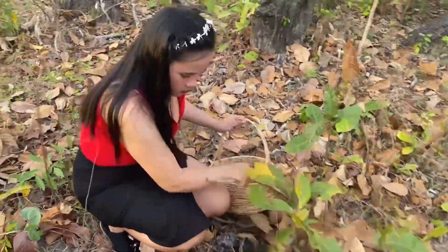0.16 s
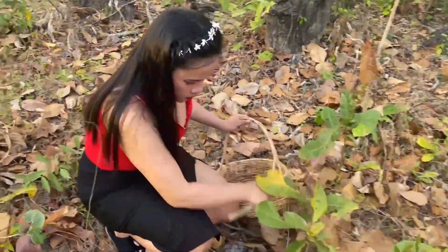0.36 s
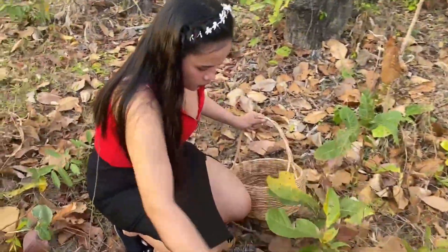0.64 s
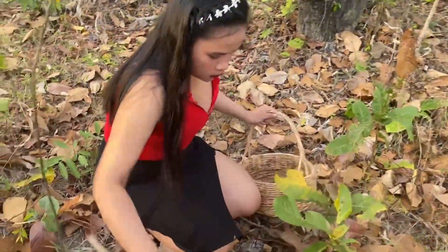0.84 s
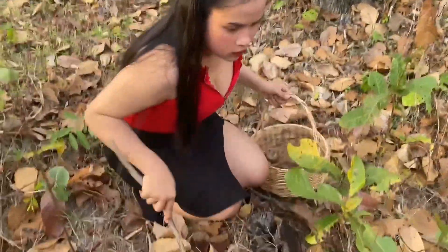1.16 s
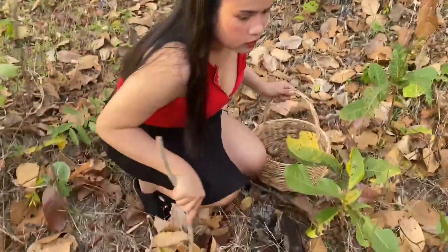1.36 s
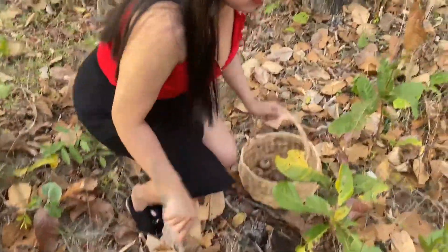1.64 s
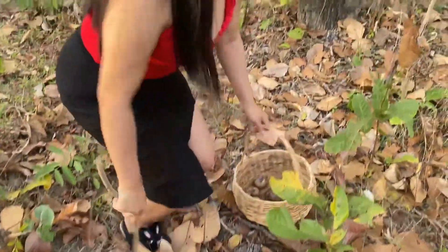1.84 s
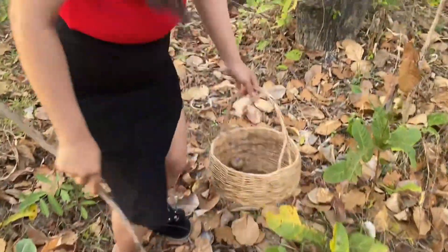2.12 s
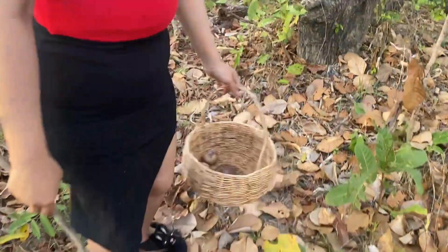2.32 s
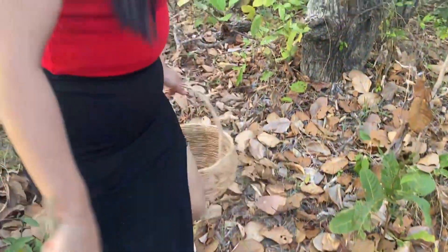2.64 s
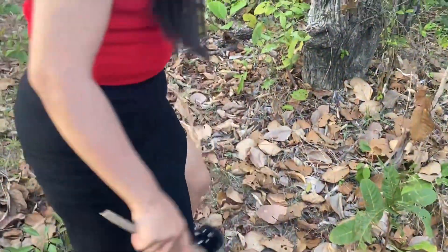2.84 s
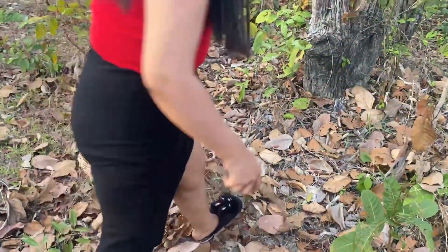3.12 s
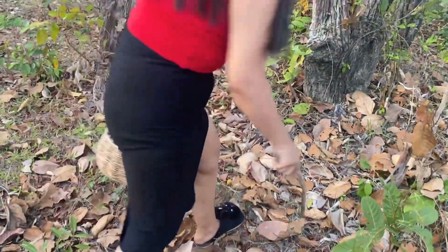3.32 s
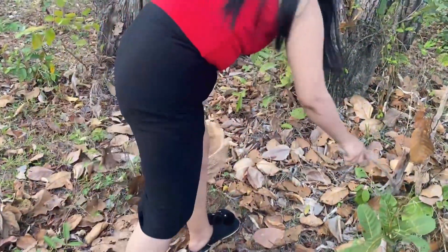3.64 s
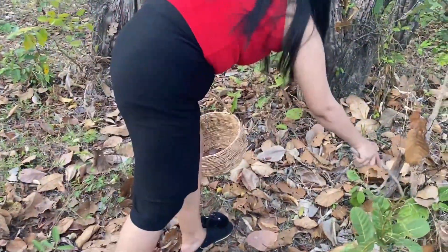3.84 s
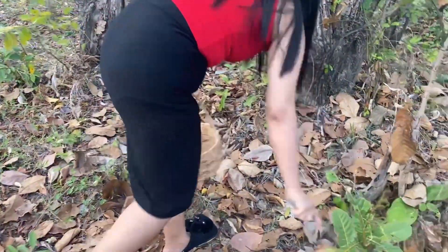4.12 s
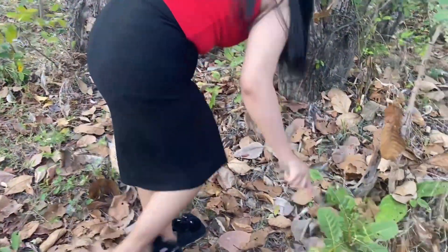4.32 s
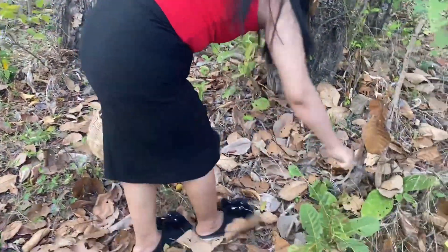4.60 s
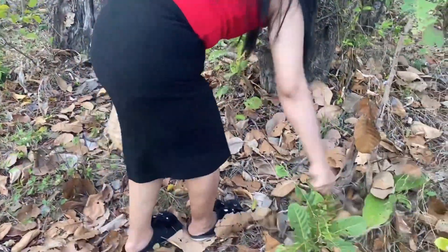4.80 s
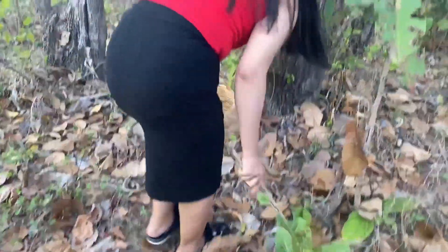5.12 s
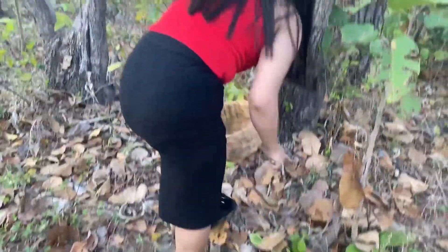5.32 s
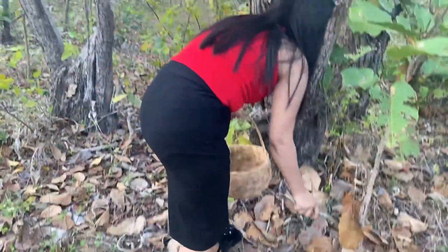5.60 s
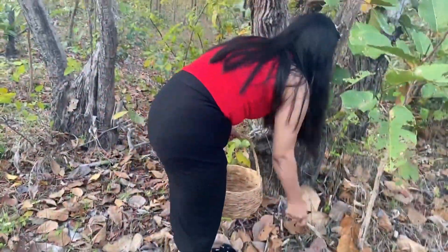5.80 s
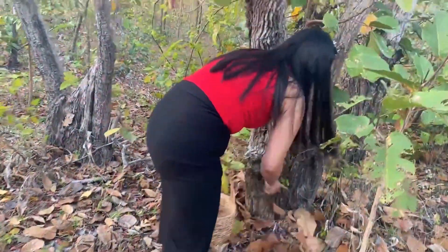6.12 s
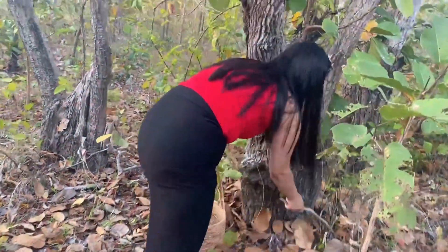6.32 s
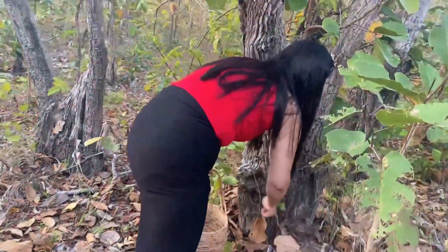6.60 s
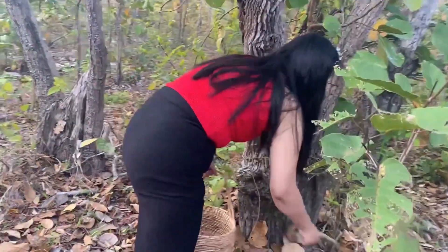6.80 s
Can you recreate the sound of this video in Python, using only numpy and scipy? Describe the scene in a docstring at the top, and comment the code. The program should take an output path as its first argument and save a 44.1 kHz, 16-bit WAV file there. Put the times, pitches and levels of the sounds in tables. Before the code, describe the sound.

Dry leaves are stirred at close range on an open forest floor, heard in stereo slightly left of centre. At once a loud, crisp rake crunches through the litter, then a sharp snap and a cluster of shorter strokes run from 0.4 to 1.0 seconds, dying down. From 1.1 to 1.7 it is nearly quiet, with tiny ticks. A swish at 1.8 leads into light shifting and scattered twig snaps from 2.0 to 2.7. Rustling builds after 2.8, with brittle cracks at 3.2 to 3.5. The heaviest crunch lands near 4.06, followed by busy raking and stepping until 4.9. Softer uneven rustles continue from 5.0 to 5.6, then a strong burst at 5.8 to 5.9, brittle snaps around 6.15 and 6.4, and a fading shuffle to about 7. Thin tree echoes and a faint low rumble with slight hiss stay underneath.

```python
"""Dry leaf litter rustles close to a two-port microphone as someone rakes it with a stick and steps across it.
The rustle is a dense stream of tiny ringing buckles plus sliding noise, driven by a table of pushes.
On the forest floor whole leaves crunch as runs of cracks, and stalks and twigs snap as short torn rings.
Sparse echoes return from the trees; a faint low rumble with a little hiss, shaped noise, lies beneath."""
import sys
import numpy as np
from scipy import signal
from scipy.fft import rfft, irfft, next_fast_len
from scipy.io import wavfile
from scipy.ndimage import uniform_filter1d

SR = 44100
rng = np.random.default_rng(int(sys.argv[2]) if len(sys.argv) > 2 else 0)


def log_audio(samples):
    """Write samples as a 16-bit WAV file to the path given in sys.argv[1]."""
    # one column per channel
    frames = np.atleast_2d(samples).T
    # limit to full scale, then quantise
    limited = np.clip(frames, -1, 1)
    pcm = np.round(limited * 32767).astype(np.int16)
    wavfile.write(sys.argv[1], SR, pcm)


N = 306515
EDGE_HZ = 11350  # upper band limit

# Pushes of stick, hand or foot through the litter: full_force_s, attack_s, hold_s, effort_db,
# weight_db (dull crush relative to effort), crispness_db (fizz relative to effort),
# breadth_db (side signal of the moving patch)
PUSHES = [(0.027, 0.032, 0.048, -38.5, -10, -1.5, -12), (0.443, 0.057, 0.034, -43.5, -9, -3.5, -3),
          (0.475, .015, .085, -46, -10, 3, -3), (0.611, 0.043, 0.033, -40.5, -11, -5.5, -3),
          (0.701, 0.0053, 0.02, -46.5, -10, -1.5, -2), (0.864, 0.0058, 0.0064, -48, -9.5, -7, 2),
          (0.916, 0.022, 0.0031, -46.5, -12, 1.5, -1), (1.02, 0.047, 0.019, -53, -17, 1, 2),
          (1.164, 0.038, 0.016, -58.5, -5.5, 1, -1), (1.526, .005, 0.087, -63.5, -7, -4.5, 7),
          (1.785, 0.046, .005, -44, -5.5, -1, 5), (1.868, 0.071, 0.13, -50, -18.5, -8.5, -1),
          (2.195, 0.13, 0.088, -58, -30, -4, 1), (2.462, 0.0059, .04, -54, -15, -6.5, 4),
          (2.553, 0.021, .01, -61.5, 3.5, -2, 8), (2.759, 0.039, 0.034, -53.5, -3.5, -10, 2),
          (2.874, 0.047, 0.091, -50.5, -12, -4, 3), (3.182, 0.096, 0.081, -48.5, -15, -1.5, -1.5),
          (3.414, 0.0041, 0.023, -46.5, -18.5, -4, 3), (3.513, 0.043, 0.041, -45, -8.5, -6.5, 0),
          (3.636, 0.15, 0.15, -55, -4.5, -3, 3), (3.874, .004, 0.004, -54.5, -9, 3, 5.5),
          (3.963, 0.075, 0.064, -49.5, -9, 0, 0), (4.061, 0.036, 0.0053, -35, -9.5, -5, -0.5),
          (4.155, 0.027, 0.042, -43.5, -8, -3.5, -4), (4.258, 0.0051, .02, -48.5, -7.5, -3.5, -13),
          (4.408, .008, 0.033, -44.5, -5.5, -6, 4.5), (4.456, 0.03, 0.089, -41.5, -10.5, -2.5, 2.5),
          (4.713, 0.0081, 0.083, -45, -5, 1.5, -2), (4.904, 0.029, 0.052, -48.5, -7.5, 1.5, -8),
          (5.026, .012, 0.011, -53, -0.5, -2, -6), (5.09, 0.0056, 0.039, -59, -3, 2, 6),
          (5.295, .04, 0.029, -48, -6, -6.5, -1), (5.452, 0.05, 0.017, -48.5, -4.5, -6, -1),
          (5.572, 0.045, 0.0079, -50, -10, 3, 1), (5.817, 0.042, 0.044, -38.5, -9.5, -5.5, -5.5),
          (5.896, .01, 0.029, -45.5, -5.5, -1.5, -5), (6.01, 0.0078, 0.0083, -50, -12, -16, -8),
          (6.132, 0.11, 0.15, -50.5, -25, -9, -10), (6.365, .008, .02, -44, -18, -1.5, -5),
          (6.408, 0.012, 0.037, -44, -22, 0.5, -2), (6.594, 0.024, 0.084, -54.5, -9.5, -2.5, 1),
          (6.775, .02, 0.035, -56.5, -6.5, -3, 5)]
RELEASE_S = 0.037  # the leaves spring back after each push
# Leaves that keep shifting under the feet: time_s, effort_db
SHIFTING_LEAVES = [(0.3, -55.5), (0.8, -61.5), (1.1, -63.5), (1.3, -69.5), (1.5, -75.5), (1.7, -55),
                   (2.05, -54.5), (2.2, -68.5), (2.45, -58.5), (2.68, -61), (3.0, -51), (3.8, -59),
                   (4.3, -55), (4.67, -59.5), (5.2, -52), (5.65, -59), (6.5, -56), (6.95, -59)]
SHIFT_WEIGHT_DB, SHIFT_CRISP_DB, SHIFT_BREADTH_DB = -11, -3.5, 0
# Colour of the rustle: frequency_hz, level_db (relative, per Hz)
LEAF_COLOUR = [(90, -7.5), (170, -3.5), (260, -4), (380, -2), (520, -3), (850, 3), (1350, 3.2),
               (1620, -0.5), (1800, 2.5), (2350, 2.5), (3600, 1.53), (5500, -5.5), (7500, -9.5), (9500, -8),
               (11200, -15.5)]
# Colour of the rumble and hiss: frequency_hz, level_db (relative, per Hz)
AIR_COLOUR = [(20, -28), (35, -15), (50, -5.5), (68, 0.5), (90, -4.5), (130, -11.5), (200, -20), (400, -26),
              (1000, -25), (3000, -32), (11000, -39.5)]
AIR_DB = -64.5
# Leaves collapsing in a quick run of cracks: start_s, level_db (before the decay), pitch_hz, decay_s
LEAF_CRUNCHES = [(0.03, -35, 2660, 0.029), (0.442, -36, 1680, 0.009), (0.475, -38, 4300, 0.032),
                 (0.567, -38.5, 3700, 0.01), (0.703, -42, 1730, 0.013), (0.742, -43, 1300, 0.025),
                 (0.868, -45.5, 2050, 0.021), (1.375, -62, 279, 0.026), (1.516, -59, 460, 0.071),
                 (1.524, -55, 2090, 0.027), (2.753, -56, 1170, 0.022), (2.761, -56, 262, 0.026),
                 (3.233, -33, 2330, 0.0033), (3.414, -45, 750, 0.02), (3.415, -42.5, 2600, 0.015),
                 (3.459, -36, 1260, 0.0043), (3.514, -38.5, 1110, 0.0099), (4.055, -41.5, 2800, 0.1),
                 (4.066, -44, 322, 0.019), (4.258, -45.5, 1000, 0.0057), (4.412, -44.5, 1130, 0.05),
                 (4.721, -40.5, 2370, 0.032), (4.791, -42.5, 2580, 0.016), (5.141, -47.5, 850, 0.016),
                 (5.142, -50, 345, 0.01), (5.871, -39, 1800, 0.01), (5.897, -35, 1790, 0.011),
                 (6.091, -38, 1860, 0.013), (6.298, -45.5, 3150, 0.025), (6.368, -46.5, 930, 0.033),
                 (6.408, -43, 950, 0.021), (6.454, -39, 990, 0.011), (6.46, -37.5, 2320, 0.0062),
                 (6.611, -52, 268, 0.0074), (6.651, -43, 1680, 0.016)]
# Stalks and twigs breaking: start_s, peak_db (before a shared trim), pitch_hz
STALK_SNAPS = [(0.2364, -33, 4100), (0.477, -17.5, 3400), (0.874, -33, 2400), (1.302, -44, 4500),
               (1.4508, -45, 3300), (1.571, -32, 6540), (1.96, -26, 4120), (2.009, -30, 5050),
               (2.0662, -31.5, 2760), (2.1013, -29, 2600), (2.141, -26, 3460), (2.1928, -40, 2900),
               (2.3082, -35, 2460), (2.4584, -26, 2680), (2.4775, -33, 2030), (2.5116, -29.5, 2240),
               (2.5996, -28.5, 2460), (2.642, -36.5, 3300), (3.073, -29.5, 2720), (3.2354, -27, 2600),
               (3.3247, -34, 4340), (3.3396, -35, 1240), (3.4415, -23.5, 6650), (4.03, -30, 4300),
               (4.627, -32, 4350), (5.4753, -26, 5450), (5.084, -25.5, 7500), (5.9245, -24.5, 5060),
               (6.007, -32.5, 2920), (6.1483, -23.5, 2620), (6.3494, -32, 3380), (6.4152, -18, 4700)]
# Place of the stirring between the ports: time_s, left_minus_right_db
STIRRING_PLACE = [(0, 0.5), (1.0, 2.5), (1.75, 2.2), (2.2, 1.5), (3.2, 1.9), (3.7, 2.5), (5.0, 2.2),
                  (5.8, 0.8), (6.95, 1.7)]
# Width of the sound between the ports: frequency_hz, side_gain_db; it is widest in a narrow band near 5.3 kHz
PORT_SPREAD = [(60, -25), (130, -13.5), (380, -24.5), (700, -16.5), (1150, -18.5), (1550, -1.5),
               (1900, -11), (2300, -8.5), (3300, -4.5), (4000, -8), (5300, 1.5), (6500, -13), (7500, -8.5),
               (8700, -12), (10200, -11.5)]
# Phase lead of the left port over the right for the close sounds: frequency_hz, lead_rad
LEFT_LEAD = [(100, -0.051), (1400, -0.28), (1700, -0.3), (2500, 0.62), (3300, 0.65), (3800, -0.39),
             (5000, -0.12), (6000, -0.15), (11000, 0.58)]
# Difference in colour of the ports: frequency_hz, left_minus_right_db
PORT_COLOUR = [(100, -1.5), (1000, -2), (1400, 0.5), (1700, -2.5), (2300, -1), (3400, -0.5), (5300, -1),
               (8300, -3.5), (10000, -1.7)]


def gain_of(db):
    """Decibels to amplitude gain."""
    return 10 ** (np.asarray(db) / 20)


def evened(x):
    """Scales to rms 1."""
    return x / np.sqrt(np.mean(x ** 2) + 1e-20)


def read(points, hz):
    """Reads a frequency table, joined by lines on a log-frequency axis."""
    f, value = np.transpose(points)
    return np.interp(np.log(hz + 1), np.log(f + 1), value)


def curves(rows):
    """The columns of a time table, one value a sample."""
    s, *columns = np.transpose(rows)
    return [np.interp(np.arange(N) / SR, s, column) for column in columns]


def shaped(x, gain):
    """Filters by a gain that is a function of frequency."""
    size = next_fast_len(N + 4096)
    spectrum = rfft(x, size) * gain(np.fft.rfftfreq(size, 1 / SR))
    return irfft(spectrum, size)[..., :N]


def drift(per_s):
    """Smooth random wandering of rms 1, mostly slower than per_s."""
    return evened(shaped(rng.standard_normal(N), lambda f: np.exp(-(f / per_s) ** 2)))


def add(mix, s, sound):
    """Lays a sound into the mix at a time in seconds."""
    part = mix[max(round(s * SR), 0):][:len(sound)]
    part += sound[:len(part)]


def ports(mid, side):
    """Two close ports share the bass and differ more in the treble."""
    side = shaped(side, lambda f: gain_of(read(PORT_SPREAD, f)))
    return np.array([mid + side, mid - side])


def crack(hz, cycles, rise=0.28):
    """One buckle: a stiff patch of leaf flips over and rings briefly; decay and rise are in cycles."""
    turns = np.arange(512) * hz / SR
    envelope = np.exp(-turns / cycles) * (1 - np.exp(-(turns / rise) ** 2))
    ring = np.sin(2 * np.pi * turns) * envelope
    return ring / abs(ring).max()


def stirring():
    """Pushes swell, hold and let go: effort, weight, crispness, breadth (dB); stronger pushes weigh more in colour."""
    t = np.arange(N) / SR
    power = gain_of(curves(SHIFTING_LEAVES)[0]) ** 2
    shift_colour = gain_of([SHIFT_WEIGHT_DB, SHIFT_CRISP_DB, SHIFT_BREADTH_DB]) ** 2
    colour = np.outer(shift_colour, power)
    for s, attack, hold, effort_db, *colour_db in PUSHES:
        near = slice(*np.searchsorted(t, [s - .5, s + hold + .5]))
        swell = np.minimum((t[near] - s) / attack, 0)
        release = np.maximum((t[near] - s - hold) / RELEASE_S, 0)
        push = (gain_of(effort_db) * np.exp(swell - release)) ** 2
        power[near] += push
        colour[:, near] += np.outer(gain_of(colour_db) ** 2, push)
    return 10 * np.log10([power, *(colour / power)])


def buckles(per_s, cycles, spread_db, count=24):
    """A stream of cracks from leaf patches of many sizes, evened to a white spectrum below the band limit."""
    hit = rng.random(N) < per_s / SR
    size_db = spread_db * np.minimum(rng.exponential(1, N), 4)
    size = gain_of(size_db) * rng.choice([-1, 1], N)
    clicks = hit * size / np.sqrt(np.minimum(per_s, SR))
    # small, high-pitched patches buckle more often
    patch = (count * rng.random(N) ** (2 / 3)).astype(int)
    out = np.zeros(N)
    for k, hz in enumerate(np.geomspace(250, 10000, count)):
        out += signal.oaconvolve(clicks * (patch == k), crack(hz, cycles))[:N]
    f, power = signal.welch(out, SR, nperseg=256)
    whiten = lambda hz: np.interp(hz, f[1:], power[1:]) ** -.5 * (hz < EDGE_HZ)
    return evened(shaped(out, whiten))


def leaf_pops(per_s=70, cycles=13.0, spread_db=3, share=0.19):
    """Whole curled leaves pop, fewer and longer ringing than the small buckles."""
    return share * buckles(per_s, cycles, spread_db)


def patchy(x, depth_db, wide_hz=350, long_s=.028):
    """Each leaf that moves favours its own pitches for a moment: random gains over time and frequency."""
    z = signal.stft(x, nperseg=256, noverlap=192)[2]
    across = max(round(wide_hz * 256 / SR), 1)
    along = max(round(long_s * SR / 64), 1)
    patches = rng.standard_normal(z.shape[-2:])
    patches = uniform_filter1d(uniform_filter1d(patches, across, 0), along, 1)
    z = z * gain_of(depth_db * evened(patches))
    return signal.istft(z, nperseg=256, noverlap=192)[1][..., :N]


def rustle(effort, weight, crisp, per_s=5000, busier=.6, spread_db=0.0, cycles=1.0, slide=0.87,
           clump_db=1.5, clumps_per_s=80, patchy_db=2.5,
           crush_db=-2.5, crinkle_db=-2.0, fizz_db=0, crush_hz=700, fizz_hz=5500):
    """Harder stirring breaks more leaves at once; weight adds the dull crush of deep litter, thin edges add fizz."""
    rate = per_s * gain_of(busier * (effort - np.median(effort)))
    grains = np.array([buckles(rate, cycles, spread_db) for _ in range(2)])  # mid and side
    grains = grains + slide * rng.standard_normal((2, N))  # leaves also slide over each other
    grains[0] += leaf_pops()
    # the leaves catch and let go in clumps
    clumped = grains * gain_of(clump_db * drift(clumps_per_s))
    grains = patchy(clumped, patchy_db)

    low = lambda f: 1 / np.sqrt(1 + (f / crush_hz) ** 6)
    high = lambda f: 1 / np.sqrt(1 + (fizz_hz / (f + 1)) ** 10)
    middle = lambda f: np.sqrt(np.maximum(1 - low(f) ** 2 - high(f) ** 2, 0))
    total = lambda f: low(f) + middle(f) + high(f)

    def part(band):
        """One band of the leaf colour, at rms 1."""
        return evened(shaped(grains, lambda f: gain_of(read(LEAF_COLOUR, f)) * band(f) / total(f)))

    crush = gain_of(crush_db + weight) * part(low)
    crinkle = gain_of(crinkle_db) * part(middle)
    fizz = gain_of(fizz_db + crisp) * part(high)
    return gain_of(effort) * (crush + crinkle + fizz)


def air():
    """A steady low outdoor rumble with a faint hiss, from shaped noise."""
    colour = lambda f: gain_of(read(AIR_COLOUR, f))
    mid, side = (evened(shaped(rng.standard_normal(N), colour)) for _ in range(2))
    return gain_of(AIR_DB) * ports(mid, side)


def crunches(per_s=3000, cycles=1.14, scatter=0.17, level_db=0, first=1.14, count=5):
    """Each collapse starts with firm cracks and dies away as a run of cracks around one pitch."""
    out = np.zeros(N)
    t = np.arange(SR // 8) / SR
    for s, db, hz, decay_s in LEAF_CRUNCHES:
        run, fade = np.zeros(len(t)), np.exp(-t / decay_s)
        for step in np.linspace(-1, 1, count):
            clicks = rng.standard_normal(len(t)) * (rng.random(len(t)) < per_s / count / SR)
            clicks[rng.integers(SR // 400)] = first * rng.choice([-1, 1])  # within 2.5 ms
            ring = crack(hz * np.exp(scatter * step), cycles) * (1 - abs(step) / 2)
            run += signal.fftconvolve(clicks * fade, ring)[:len(t)]
        # a shorter run carries less energy
        add(out, s, gain_of(db + level_db) * evened(run) * np.sqrt(np.mean(fade ** 2)))
    return out


def snap(hz, second=0.27, tear=0.15, tear_s=0.001, splinter=0.046, splinter_s=0.0088):
    """A stalk gives way in two steps about a millisecond apart, tearing as it goes, then its last fibres splinter."""
    t = np.arange(2048) / SR
    fibres = rng.standard_normal(len(t)) * (rng.random(len(t)) < .25)
    force = fibres * (tear * np.exp(-t / tear_s) + splinter * np.exp(-t / splinter_s))
    force[0] = 1
    force[round(rng.uniform(.0006, .0014) * SR)] = second * rng.choice([-1, 1])
    sound = signal.fftconvolve(force, crack(hz, cycles=.72))
    return sound / abs(sound).max()


def snaps(effort, level_db=-2, small_db=9, vary_db=1.5, small_hz=4800, octaves=0.82, count=200):
    """Thick stalks break at their moments; thin veins tick at random, louder where the stirring is harder."""
    out = np.zeros(N)
    for s, db, hz in STALK_SNAPS:
        add(out, s, gain_of(db + level_db) * snap(hz))
    for _ in range(count):
        at = rng.integers(N)
        size, pitch = rng.standard_normal(2)
        level = gain_of(effort[at] + small_db + vary_db * size)
        hz = min(small_hz * 2 ** (octaves * pitch), EDGE_HZ)
        add(out, at / SR, level * snap(hz))
    return out


def scatter_off(x, t60, gap_s):
    """Sparse echoes of random sign from ground and trunks, with a total tap energy of 1."""
    t = np.arange(SR // 2) / SR
    present = (rng.random(len(t)) < .15) * (t > gap_s)
    taps = rng.choice([-1, 1], len(t)) * present * gain_of(-60 * t / t60)
    return signal.fftconvolve(x, taps / (np.linalg.norm(taps) + 1e-12))[:N]


def scene(forest_db=-24, width_db=-3):
    """The litter close by, a little nearer the left port, with a thin echo from the trees."""
    effort, weight, crisp, breadth_db = stirring()
    pan_db, = curves(STIRRING_PLACE)
    mid, side = rustle(effort, weight, crisp)
    breaks = crunches() + snaps(effort)
    mid = mid + breaks
    side = side + gain_of(width_db) * scatter_off(breaks, t60=0.014, gap_s=.0003)
    near = ports(mid, side * gain_of(breadth_db))
    # half the phase lead and half the level difference go to each port
    near = shaped(near, lambda f: np.exp(.5j * np.outer([1, -1], read(LEFT_LEAD, f))))
    near = near * gain_of(np.array([pan_db, -pan_db]) / 2)
    forest = ports(*(scatter_off(mid, t60=0.83, gap_s=0.032) for _ in range(2)))
    return near + gain_of(forest_db) * forest + air()


def record(dry, bass_hz=42):
    """Each port has its own colour and loses the deepest bass; then the band limit."""
    coloured = shaped(dry, lambda f: gain_of(np.outer([1, -1], read(PORT_COLOUR, f)) / 2))
    bass_cut = signal.butter(2, bass_hz, "high", fs=SR, output="sos")
    coloured = signal.sosfilt(bass_cut, coloured)
    band_limit = signal.firwin(255, EDGE_HZ, window=("kaiser", 9), fs=SR)
    return signal.oaconvolve(coloured, band_limit[None], "same")


dry = scene()
out = record(dry)
log_audio(out)
```